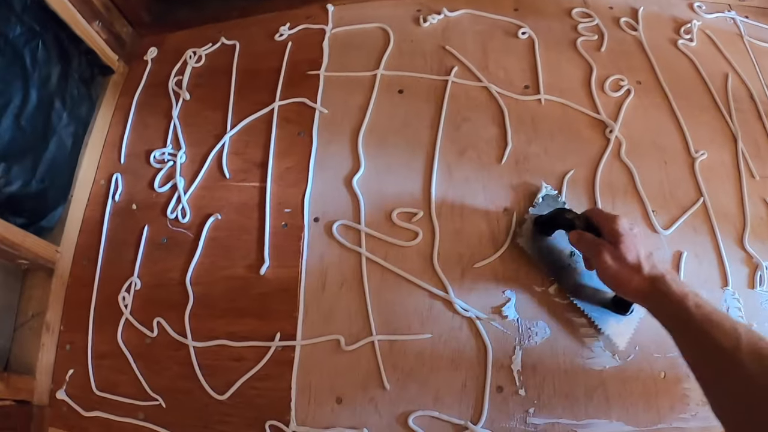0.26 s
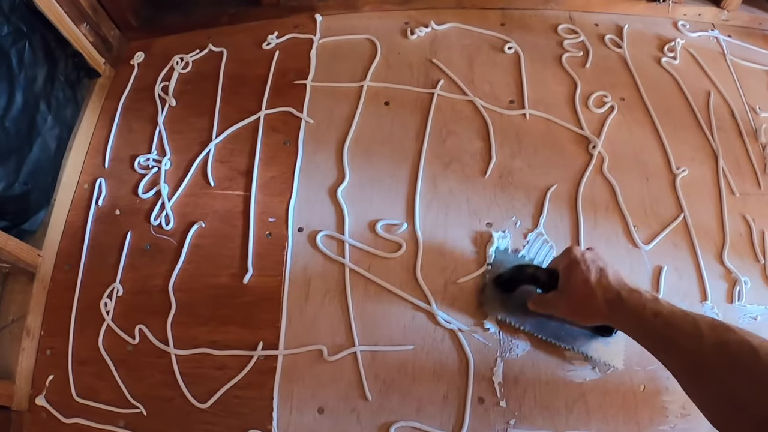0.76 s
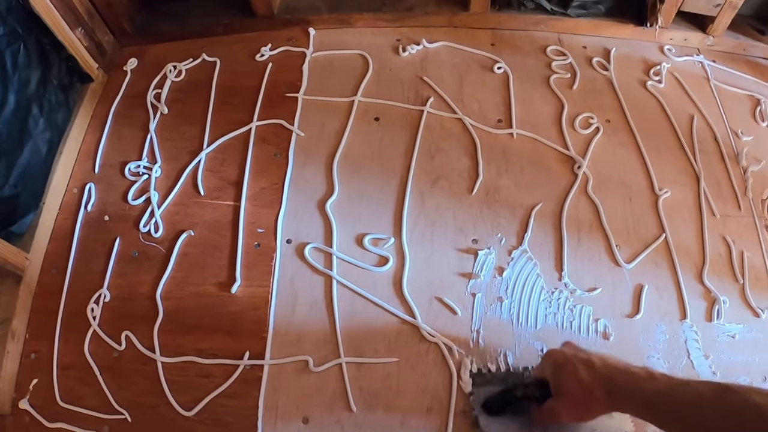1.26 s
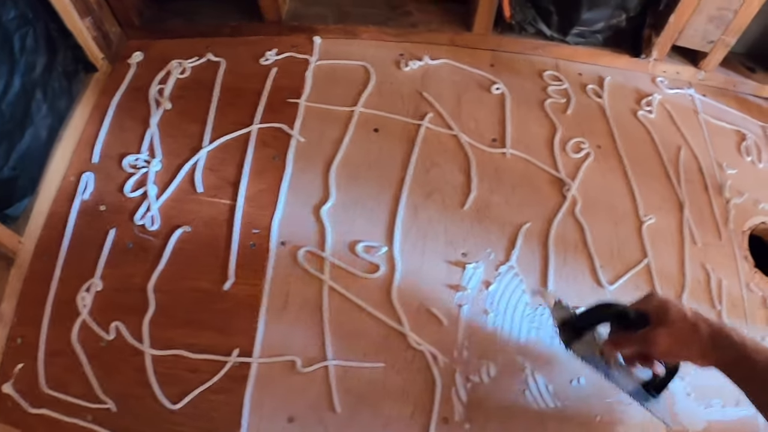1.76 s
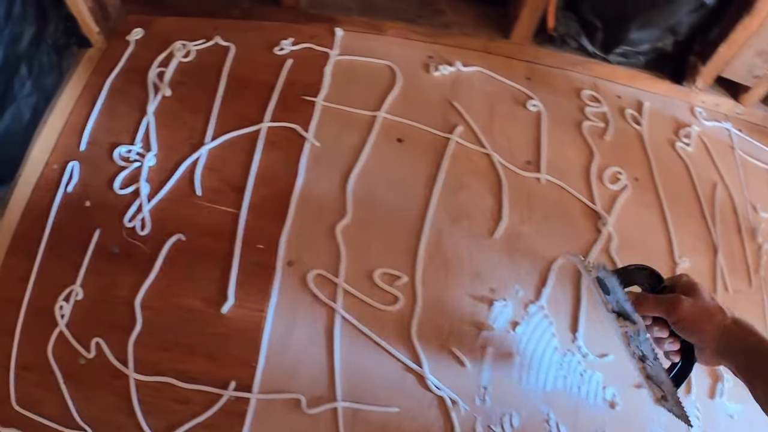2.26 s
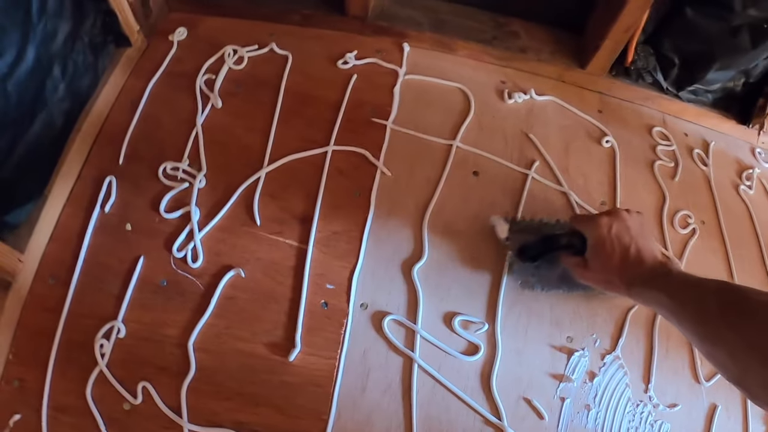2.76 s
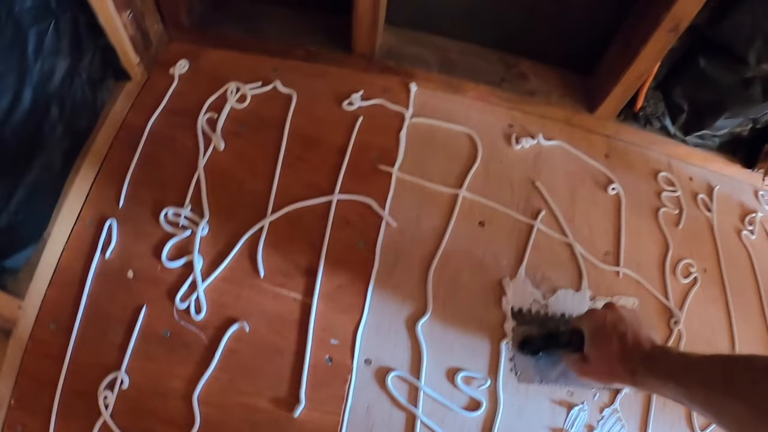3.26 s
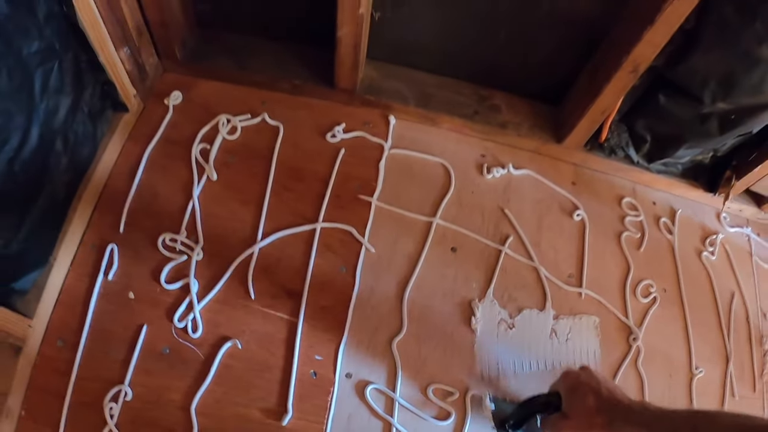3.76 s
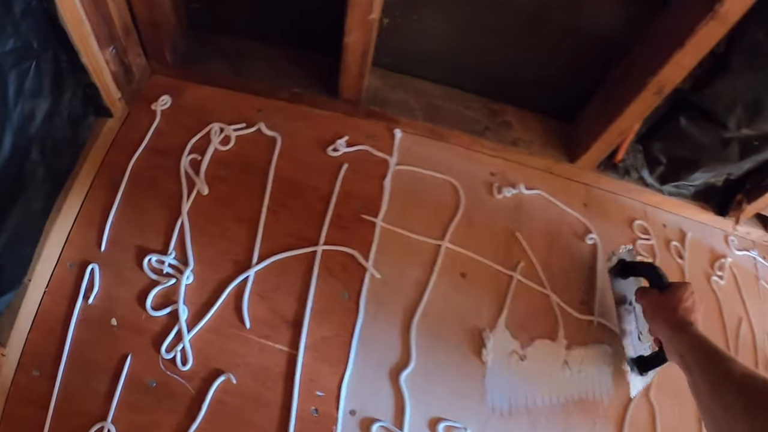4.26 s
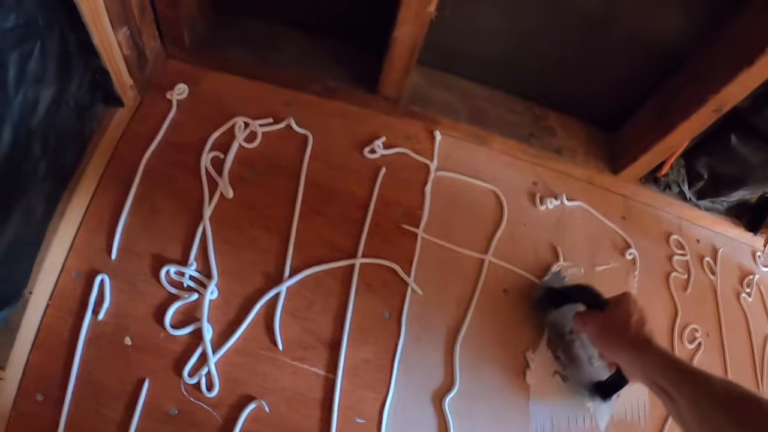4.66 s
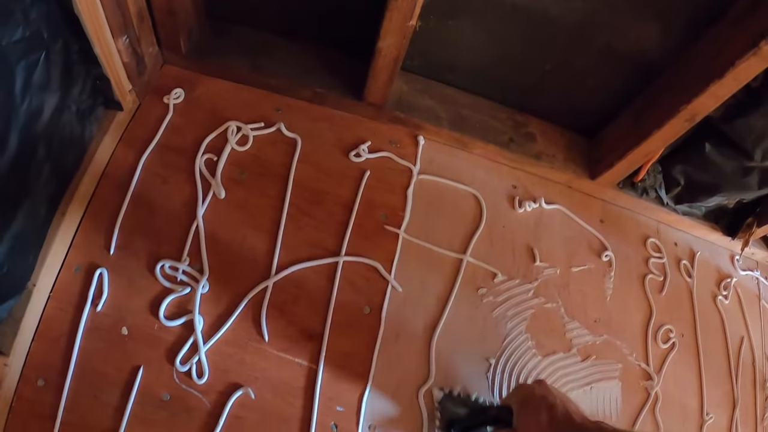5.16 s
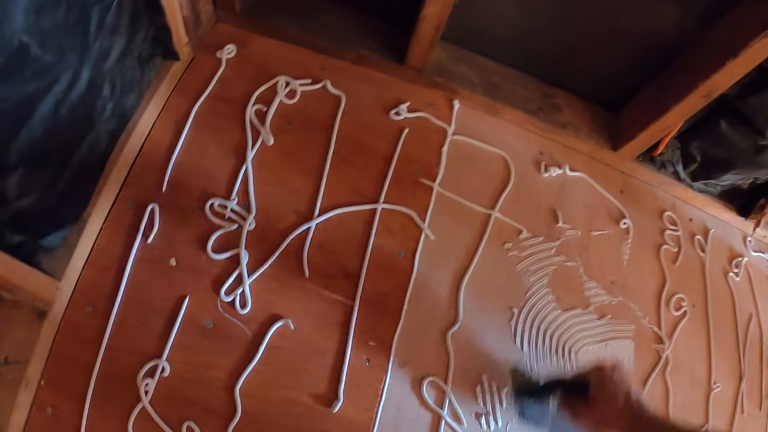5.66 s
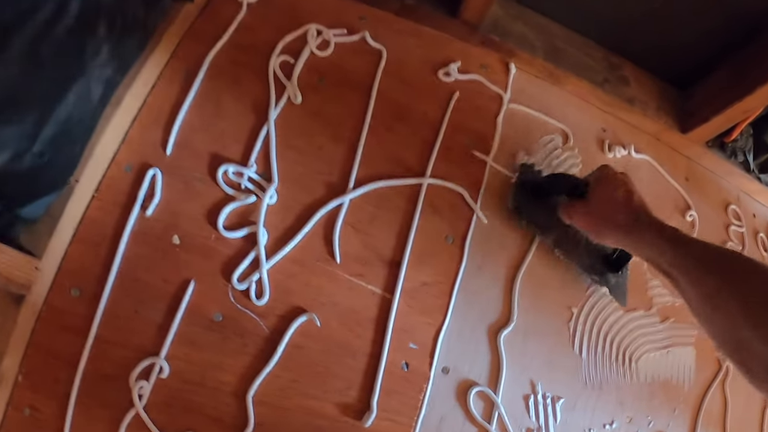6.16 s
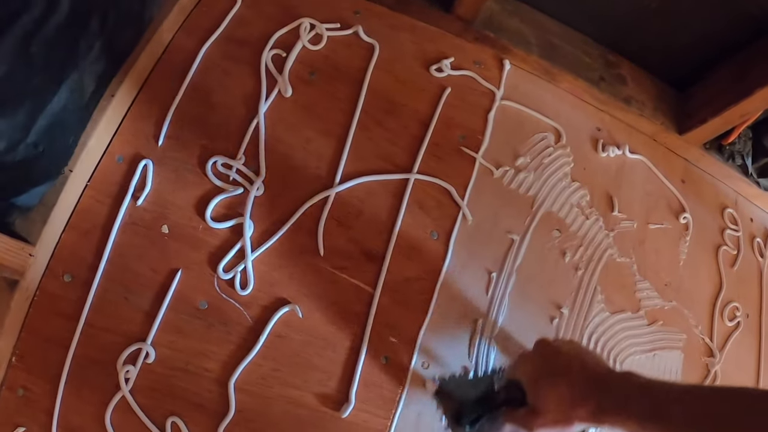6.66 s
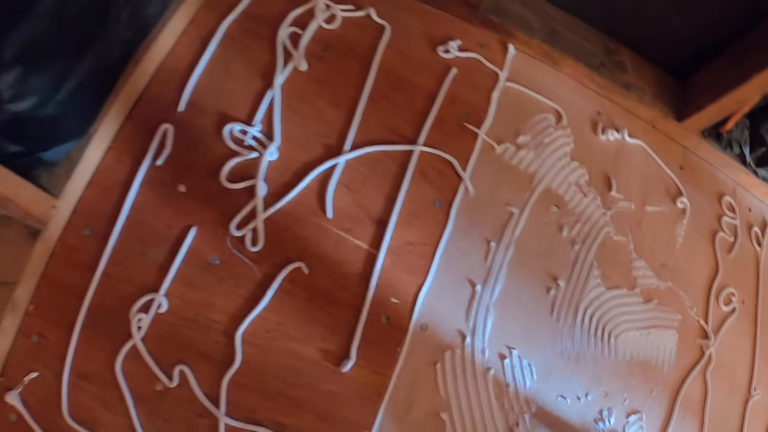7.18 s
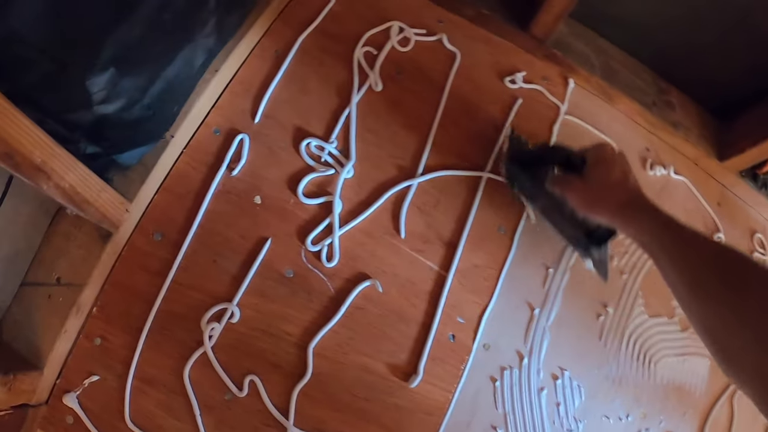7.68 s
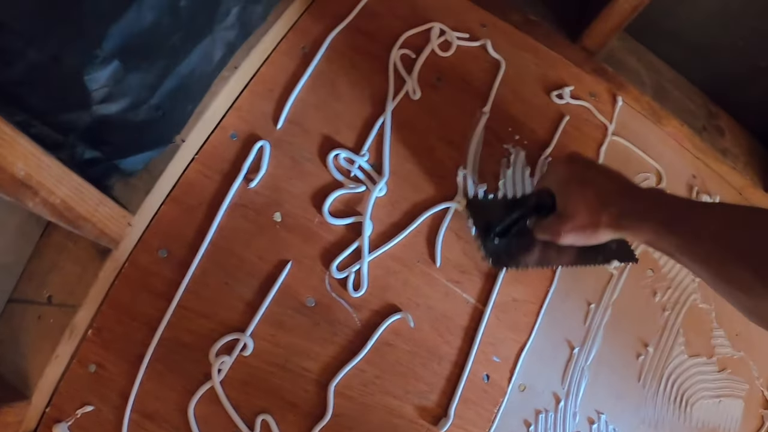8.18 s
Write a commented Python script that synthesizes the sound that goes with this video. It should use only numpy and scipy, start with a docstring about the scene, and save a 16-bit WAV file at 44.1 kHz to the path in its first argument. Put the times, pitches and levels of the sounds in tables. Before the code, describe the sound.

Gritty scraping strokes of a toothed metal blade on wood come in five groups, with small sticky ticks and a deep constant motor hum beneath.

```python
"""A motor hums steadily below a timber-framed room, as fixed low tones over dark rumble and faint airy noise.
Wet adhesive soon starts to tick, in short noise bursts, and the deck thuds as weight shifts on its plywood modes.
Then a notched steel trowel rasps over the wood in five sweeps of a few pulls each: random slips shake blade and deck.
Now and then its teeth catch, with a crack, a knock and a ring of steel, while ticks and thuds go on."""
import sys
import numpy as np
from scipy import signal
from scipy.fft import rfft, irfft, next_fast_len
from scipy.io import wavfile
from scipy.ndimage import map_coordinates

SR = 44100
rng = np.random.default_rng(int(sys.argv[2]) if len(sys.argv) > 2 else 0)


def put_to_file(sound):
    """Save the sound as 16-bit audio at rate SR, in the file named by the first command-line argument."""
    columns = np.atleast_2d(sound).T  # one column per channel
    safe = np.clip(columns, -1, 1)
    whole_steps = np.round(safe * 32767)
    wavfile.write(sys.argv[1], SR, whole_steps.astype(np.int16))


N = 371578
TIME = np.arange(N) / SR

# steady tones of the motor: pitch_hz [Hz], level_db [dB rms, before a slight waver]
HUM_TONES = [(48.3, -30.5), (82, -53), (110, -59.5)]
# colour of the room's low rumble: frequency_hz [Hz], density_db [dB per Hz, relative]
RUMBLE_COLOUR = [(20, -2.5), (34, 9), (45, 12.5), (62, 7.5), (82, -1.5), (100, -9.5), (130, -14.5),
                 (170, -23), (250, -28.5), (400, -34.5), (700, -54), (3000, -90)]
# colour of the air noise: frequency_hz [Hz], density_db [dB per Hz, relative]
AIR_COLOUR = [(100, 3), (300, -1), (750, -9), (1250, -5), (2000, -11), (3000, -17.5), (4200, -17.5),
              (7000, -26), (10000, -41), (15000, -58)]
# wet ticks and smacks of the glue, plus one crack of the blade at 4.402 s: start_s [s], level_db [dB at the
# peak, before the layer gains], centre_hz [Hz], length_s [s]
GLUE_TICKS = [(0.092, -34, 4700, .002), (0.178, -53, 5600, .012), (0.33, -50, 5200, .014),
              (0.461, -35, 5700, .008), (1.29, -34, 5000, .003), (1.454, -36, 3800, .014),
              (2.647, -35, 7000, .0016), (3.158, -18.5, 1900, .0018), (3.235, -28, 4000, .003),
              (3.619, -44, 4560, .009), (4.402, -39, 4200, .003), (4.443, -39, 3200, .008),
              (6.334, -38, 4500, .015), (8.032, -47, 5000, .012)]
# pushes of weight on the deck: start_s [s], level_db [dB, relative], contact_s [s]
DECK_THUDS = [(0.473, -12, 0.016), (2.294, -25, .014), (2.924, -18, 0.0085), (3.209, -30, 0.0037),
              (3.673, -24, 0.0084), (4.079, -11.5, .003), (4.1, -11.5, 0.0048), (4.406, -18.5, 0.008),
              (4.445, -23, 0.007), (8.105, -30, 0.0025)]
# modes of the plywood deck: pitch_hz [Hz], level_db [dB, relative], t60_s [s to fall 60 dB]
DECK_MODES = [(45, -19, 0.2), (71.5, -7.5, 0.25), (85.2, -1.5, 0.24), (119.3, -7, 0.24), (142.3, -8, 0.16),
              (178, -22, 0.22), (198, -17, 0.2), (238, -17, .22), (262, -20, .22), (305, -20, 0.21),
              (371, -18, 0.15)]
# pulls of the trowel: start_s [s], rise_s [s], hold_s [s], rasp_db [dB], sag_db [dB lost over the hold],
# release_s [s per 20 dB], drone_db [dB re rasp, plywood], hiss_db [dB re rasp, blade edge],
# boom_db [dB re rasp, deck], drone_hz [Hz, where its pitch settles],
# lower_hz [Hz, lower resonance], upper_hz [Hz, upper resonance]
TROWEL_PULLS = [ (.96, .05, .17, -72, 0, .08, -20, 3, -30, 800, 1900, 4200),
                (1.216, .052, .035, -40.5, 3, .1, -18, -3, -15, 800, 1560, 2900),
                (1.41, .07, .01, -47.5, 0, .15, -20, -2, -22, 800, 1400, 2700),
                (1.505, .085, .008, -35.5, 0, .075, -11, -8.5, -24, 850, 1450, 2400),
                (1.6, .04, .08, -53, 3, .11, 3, -2, -7, 580, 1200, 2400),
                (2.572, .1, .25, -48, 7, .1, -16, -3.5, -30, 800, 1800, 2400),
                (2.936, .06, .087, -33, -1, .085, -13, 0, -32, 620, 2050, 2450),
                (3.1, .05, .21, -43.5, 6, .12, -2, -3, -14, 680, 1400, 3300),
                (3.46, .045, .02, -62, 0, .07, -14, -2, -20, 700, 1400, 3700),
                (3.597, .07, .01, -42, 0, .085, -7, -2, -24, 780, 1450, 4300),
                (3.735, .07, .008, -38, 0, .06, -16, -5, -27, 850, 1800, 2700),
                (3.81, .04, .22, -52.5, 4, .06, 0, -7, -9, 600, 1300, 2400),
                (4.435, .04, .06, -40, 2, .1, -18, -8, -27, 850, 1700, 2850),
                (4.51, .07, .04, -32, 2, .15, -13, -2.5, -26, 600, 1700, 3200),
                (4.715, .075, .04, -36, 4, .07, -6, -4, -26, 660, 1700, 3000),
                (4.89, .075, .25, -44.5, 4, .12, -13, -1.5, -18, 850, 1650, 2700),
                (5.195, .11, .16, -39, 2, .1, -11, -2, -19, 620, 1700, 3400),
                (5.45, .06, .035, -35.2, 0, .055, -13, -1.5, -34, 760, 1700, 3300),
                (6.16, .09, .05, -64, 3, .06, -18, 2, -25, 850, 1650, 4200),
                (6.314, .06, .065, -38, -3, .11, -18, -2.5, -34, 900, 1850, 2700),
                (6.45, .11, .22, -40, 4, .1, -13, -4, -30, 780, 1720, 2800),
                (6.69, .07, .02, -44, 0, .1, -20, -1, -30, 750, 1700, 2800),
                (6.78, .06, .17, -46, 2, .1, -7, -4, -24, 540, 1700, 2500),
                (7.025, .14, .11, -33, 5, .08, -11, -3.5, -33, 560, 1450, 3000),
                (8.022, .018, .008, -55, 0, .05, -14, 5, -20, 850, 1500, 4000),
                (8.072, .055, .025, -40, 0, .1, -10, -5, -13, 560, 1500, 2700),
                (8.17, .09, .17, -48.5, 0, .1, -11, -5, -14, 520, 1350, 2400), ]
# colour of the teeth on wood: frequency_hz [Hz], density_db [dB per Hz, relative]
RASP_COLOUR = [(140, -48), (230, -22), (465, -9), (555, -9.5), (650, -7), (893, -3.5), (1010, -5),
               (1340, 1), (2230, -2.5), (2480, -6.5), (3400, -6.5), (6310, -8.2), (8200, -13.5),
               (10000, -16), (12800, -26.5), (15500, -45)]
# modes of the steel blade: pitch_hz [Hz], level_db [dB, relative], t60_s [s to fall 60 dB]
BLADE_MODES = [(544, -3.5, 0.14), (900, 4, 0.15), (1190, -8.5, 0.067), (1315, 1.5, 0.075),
               (1455, -5, 0.043), (1573, 3, 0.061), (1717, -3, 0.044), (1811, 6, 0.1), (2090, -7.5, 0.064),
               (2406, 8, .12), (2470, 7, 0.079), (2577, 6, .13), (2835, 6.5, 0.099), (2960, 3, 0.071),
               (3220, -12, .09), (3250, -2.5, 0.081), (3760, -7, .08), (4860, -22, .05), (6322, -7, .06),
               (7140, -14, .06), (8586, -15, .12)]
# teeth catching on the wood: start_s [s], level_db [dB at the peak, before the layer gains],
# centre_hz [Hz], length_s [s]
TOOTH_CATCHES = [(1.243, -35, 1520, .016), (1.565, -32, 1500, .02), (1.641, -32, 1200, .0067),
                 (2.283, -48, 1400, .007), (2.974, -28, 2080, .023), (3.035, -29.5, 900, .02),
                 (3.052, -33, 570, .018), (3.066, -27, 1410, .013), (3.072, -18, 2450, .008),
                 (3.104, -27, 2480, .006), (3.13, -31, 3400, .009), (3.797, -26, 1800, .017),
                 (4.074, -37, 900, .008), (4.402, -30, 1250, .009), (4.47, -37, 2850, .016),
                 (4.55, -33, 550, .006), (4.58, -31, 3100, .025), (4.612, -32, 1350, .014),
                 (4.78, -35, 2900, .014), (4.818, -39, 750, .014), (5.497, -24, 1700, .011),
                 (5.543, -33, 1250, .016), (6.42, -32, 2700, .018), (6.556, -34, 1720, .012),
                 (6.745, -39, 2700, .016), (7.052, -40, 1330, .012), (7.077, -36, 1680, .012),
                 (7.165, -28, 1600, .019), (7.25, -35, 1400, .014), (8.11, -35, 1450, .02),
                 (8.16, -38, 1400, .006)]
# colour of the reflections: frequency_hz [Hz], level_db [dB, relative]
REFLECTION_COLOUR = [(60, -26), (250, -15), (1000, -7), (2000, -6), (4000, 0), (8000, -1.5), (14000, 4)]
# left minus right level of the trowel, glue and deck: frequency_hz [Hz], difference_db [dB]
STEREO_BALANCE = [(100, 0.5), (500, -0.5), (1000, -0.5), (2000, 1.9), (4000, 0), (8000, -1.4), (14000, 0)]

RUMBLE_DB, AIR_DB = -40.5, -64.2  # rms
ROOM_T60_S = 0.24
# the right channel hears the trowel first, by a time that swings as it moves
RIGHT_LEAD_S, LEAD_SWING_S, LEAD_SWING_HZ = .000036, .000011, 4
CUTOFF_HZ = 15600
# the bare edge bites first; as the hand's weight settles, the hiss dulls and the plywood takes up the drone
SETTLE_S, BITE_HISS_DB, BITE_DRONE_DB = .045, 5, -9
HAND_WAVER_DB, HAND_WAVER_HZ = .4, 28
# the drone starts high and sinks as the blade is laid flatter
DRONE_SINK_OCTAVES = .6


def from_db(db):
    """Decibels to gain."""
    return 10 ** (np.asarray(db) / 20)


def rms_one(x):
    """Scale to unit rms."""
    return x / np.sqrt(np.mean(x ** 2) + 1e-20)


def colour(x, spectrum):
    """Shape a sound by (Hz, dB) points joined on a log-frequency axis."""
    hz, db = np.transpose(spectrum)
    size = next_fast_len(x.shape[-1])
    bins = np.maximum(np.fft.rfftfreq(size, 1 / SR), 1)
    gain = from_db(np.interp(np.log(bins), np.log(hz), db))
    return irfft(rfft(x, size) * gain, size)[..., :x.shape[-1]]


def cut(x, hz, kind, order=2):
    """Butterworth filter."""
    sos = signal.butter(order, np.clip(hz, 10, .45 * SR), kind, fs=SR, output="sos")
    return signal.sosfilt(sos, x + 1e-18)


def drift(rate_hz):
    """Smooth random wander of unit rms, with a new target rate_hz times a second."""
    steps = rng.standard_normal(N // 8)
    return rms_one(np.interp(TIME * rate_hz, np.arange(len(steps)), steps))


def ring(x, modes):
    """Sum of decaying sines set off by a force."""
    out = 0
    for hz, db, t60 in modes:
        radius = from_db(-60 / (t60 * SR))
        angle = 2 * np.pi * hz / SR
        poles = [1, -2 * radius * np.cos(angle), radius * radius]
        out = out + from_db(db) * signal.lfilter([0, np.sin(angle)], poles, x + 1e-18)
    return out


def bursts(rows, width, order, spread_db, onset_share=.3):
    """Each contact is a quickly swelling and dying cluster of uneven slips around its own pitch."""
    out, size = np.zeros(N), SR // 5
    noises = rng.standard_normal((len(rows), 2, size))
    for (start_s, db, hz, length), (slips, sizes) in zip(rows, noises):
        uneven = from_db(spread_db * np.repeat(sizes, SR // 2000)[:size])  # a new size every half millisecond
        band = [hz / (1 + width), hz * (1 + width)]
        burst = rms_one(cut(slips * uneven, band, "band", order=order))
        start, age = round(start_s * SR), TIME[:size] / length
        envelope = np.minimum(age / onset_share, np.exp(onset_share - age))
        out[start:start + size] += (from_db(db) * burst * envelope)[:N - start]
    return out


def background(waver_db=0.45, waver_hz=4, side_db=-7):
    """A motor's steady hum of slightly wavering sines, over low rumble and faint, wide air noise."""
    hum = 0
    for hz, db in HUM_TONES:
        level = from_db(db + waver_db * drift(waver_hz))
        hum = hum + level * np.sqrt(2) * np.sin(2 * np.pi * (hz * TIME + rng.random()))
    rumble = cut(colour(rng.standard_normal(N), RUMBLE_COLOUR), 18, "high")
    rumble = from_db(RUMBLE_DB) * rms_one(rumble)
    mid, side = from_db(AIR_DB) * rms_one(colour(rng.standard_normal((2, N)), AIR_COLOUR))
    return hum + rumble + mid + from_db(side_db) * side * [[1], [-1]]


def glue(level_db=-1.5, blade_db=-22, top_hz=7400, wood_db=-10, wood_hz=1600):
    """Small pockets of adhesive crackle under the blade, tap the wood and ring the steel faintly."""
    pops = cut(bursts(GLUE_TICKS, width=.35, order=1, spread_db=3), top_hz, "low", order=3)
    wood_rows = [(start_s, db, wood_hz, length) for start_s, db, _, length in GLUE_TICKS]
    taps = bursts(wood_rows, width=.6, order=2, spread_db=3)
    steel = np.std(pops) * rms_one(ring(pops, BLADE_MODES))
    return from_db(level_db) * pops + from_db(wood_db) * taps + from_db(blade_db) * steel


def thuds(level_db=-3, boards_db=-25, boards_t60_s=.28):
    """Soft pushes ring the deck and shake the boards around: the longer the contact, the duller the thud."""
    force = np.zeros(N)
    for start_s, db, contact in DECK_THUDS:
        push = np.sin(np.pi * np.minimum(TIME[:SR // 20] / contact, 1)) ** 2
        start = round(start_s * SR)
        force[start:start + len(push)] += from_db(db) * push / push.sum()
    t = TIME[:SR // 2]
    boards = rms_one(cut(rng.standard_normal(len(t)), [160, 360], "band", order=4))
    boards = boards * from_db(boards_db - 60 * t / boards_t60_s)
    return from_db(level_db) * (ring(force, DECK_MODES) + signal.oaconvolve(force, boards)[:N])


def pull_controls():
    """Each pull swells, sags while held and dies as the hand lets up: four levels and three pitches."""
    power, pitches = np.full((4, N), 1e-30), np.zeros((3, N))
    for (start_s, rise, hold, rasp_db, sag_db, release, drone_db, hiss_db, boom_db,
         drone_hz, lower_hz, upper_hz) in TROWEL_PULLS:
        start = round(start_s * SR)
        t = TIME[:min(SR, N - start)]
        swell = np.sin(np.pi / 2 * np.minimum(t / rise, 1)) ** 2
        sag = sag_db * np.clip((t - rise) / hold, 0, 1)
        level_db = rasp_db - sag - 20 * np.maximum(t - rise - hold, 0) / release
        bite = np.exp(-t / SETTLE_S)
        levels = from_db([
            level_db,
            level_db + drone_db + BITE_DRONE_DB * bite,
            level_db + hiss_db + BITE_HISS_DB * bite,
            level_db + boom_db,
        ])
        pull = (swell * levels) ** 2
        sink = 2 ** (DRONE_SINK_OCTAVES * np.maximum(1 - t / (rise + hold), 0))
        power[:, start:start + len(t)] += pull
        # where pulls overlap, the stronger one dominates the pitch
        pitches[:, start:start + len(t)] += [pull[0] * hz for hz in (drone_hz * sink, lower_hz, upper_hz)]
    waver = from_db(HAND_WAVER_DB * drift(HAND_WAVER_HZ))
    return np.sqrt(power) * waver, pitches / power[0]


def grit(per_s, spread_db):
    """Tiny slips at random moments, mostly weak and a few strong."""
    sizes = from_db(spread_db * np.minimum(rng.exponential(1, N), 4)) * rng.choice([-1, 1], N)
    return rms_one(sizes * (rng.random(N) < per_s / SR))


def resonance(friction, hz, half_width_hz, swing_octaves, swing_hz=22):
    """A resonance of the scrape, whose pitch wanders as the teeth cross the grain."""
    hz = hz * 2 ** (swing_octaves * drift(swing_hz))
    carrier = np.cos(2 * np.pi * np.cumsum(hz) / SR)
    return rms_one(cut(friction, half_width_hz, "low", order=3) * carrier)


def scrape(slips_per_s=6000, smear_db=-4, judder_db=1.2, judder_hz=130, crumbs_per_s=90, crumbs_db=-7,
           blade_db=-11, lower_db=-5.5, upper_db=-10, wood_hz=830, edge_hz=3400,
           rasp_db=-1.1, wood_db=.3, edge_db=-.8, mode_swing_db=2.5, mode_swing_hz=16,
           deck_db=-19, boom_db=2.5):
    """Teeth stick and slip over the grain through wet glue, shaking the sheet and ringing the blade."""
    (rasp, wood, edge, boom), (drone_hz, lower_hz, upper_hz) = pull_controls()
    friction = grit(slips_per_s, spread_db=3.7) + from_db(smear_db) * rng.standard_normal(N)
    friction = friction + from_db(crumbs_db) * grit(crumbs_per_s, spread_db=3)  # coarser crumbs under the teeth
    friction = friction * from_db(judder_db * drift(judder_hz))  # the blade judders as it is dragged
    rub = colour(friction, RASP_COLOUR)
    sheet = resonance(friction, drone_hz, half_width_hz=270, swing_octaves=.1)
    teeth = rms_one(cut(rub, [wood_hz, edge_hz], "band", order=3))
    # as different teeth bear on the wood, the blade's modes come and go
    steel = 0
    for mode in BLADE_MODES:
        steel = steel + ring(friction * from_db(mode_swing_db * drift(mode_swing_hz)), [mode])
    steel = from_db(blade_db) * rms_one(steel)
    board = from_db(lower_db) * resonance(friction, lower_hz, half_width_hz=130, swing_octaves=.08)
    board = board + from_db(upper_db) * resonance(friction, upper_hz, half_width_hz=170, swing_octaves=.07)
    hiss = rms_one(cut(rub, edge_hz, "high", order=4))
    shaken = ring(friction, DECK_MODES)
    deck = from_db(deck_db) * rasp * rms_one(cut(shaken, [110, 170], "band"))
    deck = deck + from_db(boom_db) * boom * rms_one(cut(shaken, [185, 400], "band"))
    rasping = from_db(rasp_db) * rasp * (teeth + steel + board)
    return rasping + deck + from_db(wood_db) * wood * sheet + from_db(edge_db) * edge * hiss


def catches(knock_db=-4.5, crack_db=-13, blade_db=-15):
    """A snagged tooth cracks, knocks on the wood and leaves the blade ringing."""
    knocks = bursts(TOOTH_CATCHES, width=.25, order=2, spread_db=2)
    cracks = cut(bursts(TOOTH_CATCHES, width=1, order=1, spread_db=3), 6500, "low")
    steel = np.std(knocks) * rms_one(ring(knocks, BLADE_MODES))
    return from_db(knock_db) * knocks + from_db(crack_db) * cracks + from_db(blade_db) * steel


def room(x, wet_db=0, early_s=0.013, tail_db=-10, shift_hz=14, count=8):
    """Sound arrives on the right first; close reflections shift as the trowel moves, with a short tail."""
    t = TIME[:SR // 2]
    decay = np.exp(-t / early_s) + from_db(tail_db - 60 * t / ROOM_T60_S)
    lag = (RIGHT_LEAD_S + LEAD_SWING_S * drift(LEAD_SWING_HZ)) * SR
    out = np.array([map_coordinates(x, [np.arange(N) - lag], order=3), x])
    # the sound wanders between several echo patterns at constant total power
    shares = np.array([drift(shift_hz) for _ in range(count)])
    for share in shares / np.linalg.norm(shares, axis=0):
        echoes = rng.standard_normal((2, len(t))) * decay * (t > .001)
        echoes = colour(echoes / np.linalg.norm(echoes, axis=1, keepdims=True), REFLECTION_COLOUR)
        out = out + from_db(wet_db) * signal.oaconvolve((share * x)[None], echoes, axes=1)[:, :N]
    return out


def scene(glue_wet_db=-4):
    """Trowel and deck in the room, over the hum; the glue's ticks stay drier."""
    left, right = room(scrape() + catches() + thuds()) + room(glue(), wet_db=glue_wet_db)
    lean = np.array(STEREO_BALANCE)
    # each side takes half of the level difference
    return np.array([colour(left, lean * [1, .5]), colour(right, lean * [1, -.5])]) + background()


def record(dry):
    """A steep elliptic low-pass removes the top."""
    return signal.sosfilt(signal.ellip(10, .1, 80, CUTOFF_HZ, fs=SR, output="sos"), dry)


dry = scene()
out = record(dry)
put_to_file(out)
```